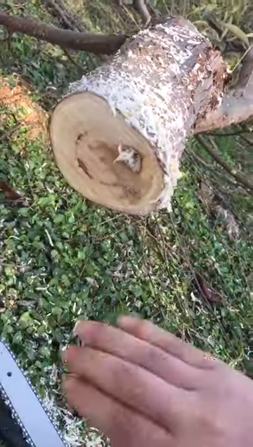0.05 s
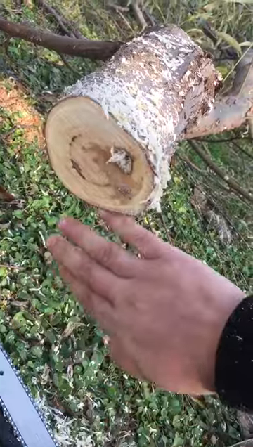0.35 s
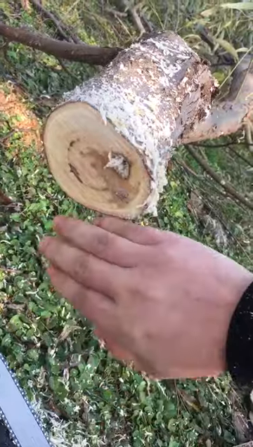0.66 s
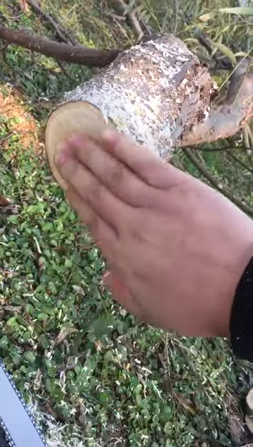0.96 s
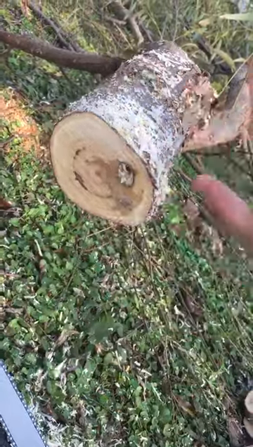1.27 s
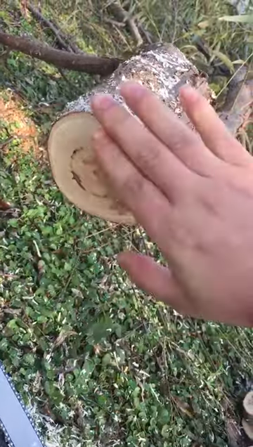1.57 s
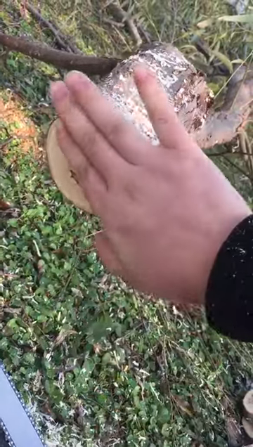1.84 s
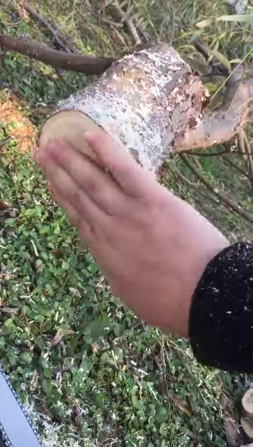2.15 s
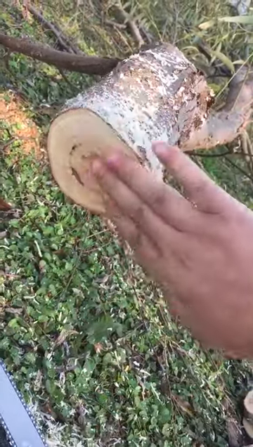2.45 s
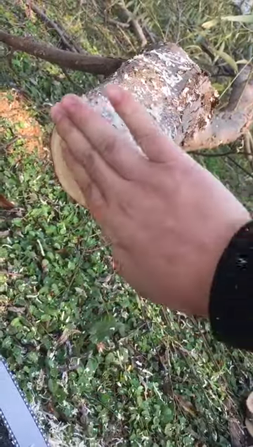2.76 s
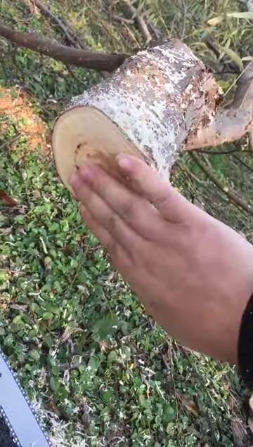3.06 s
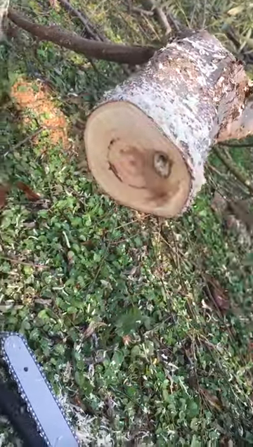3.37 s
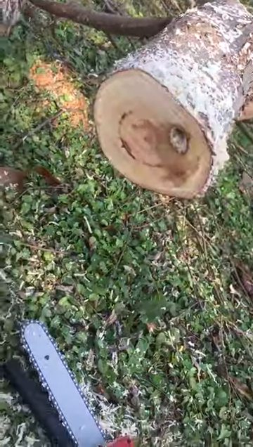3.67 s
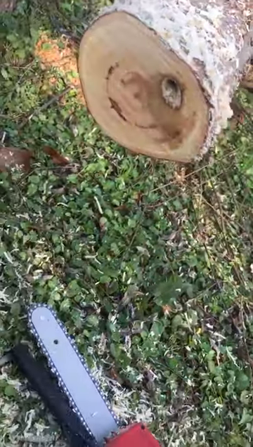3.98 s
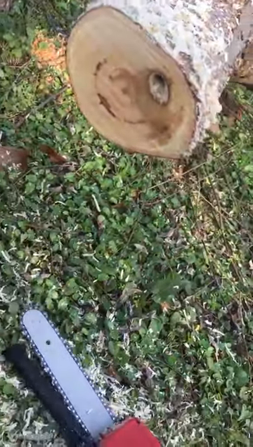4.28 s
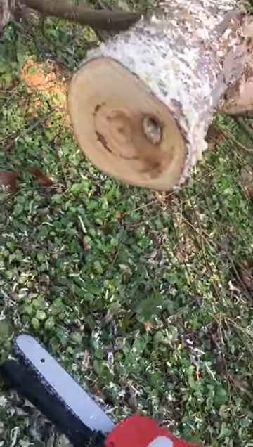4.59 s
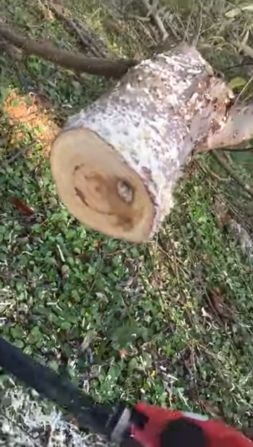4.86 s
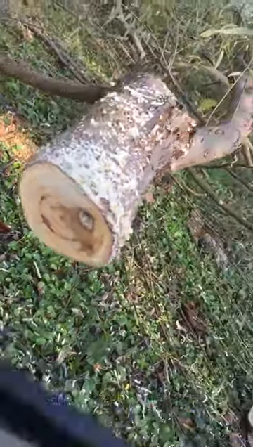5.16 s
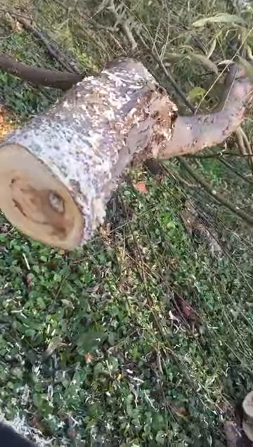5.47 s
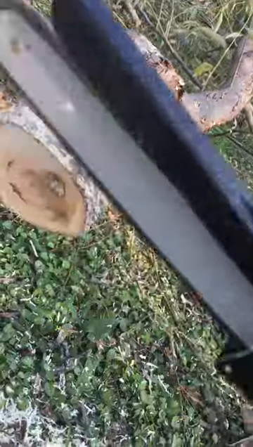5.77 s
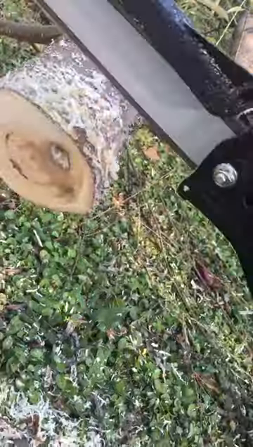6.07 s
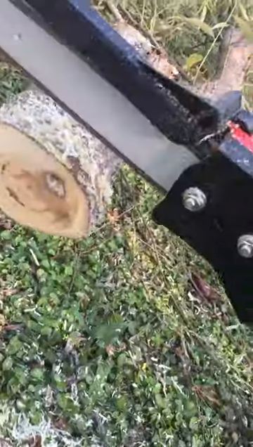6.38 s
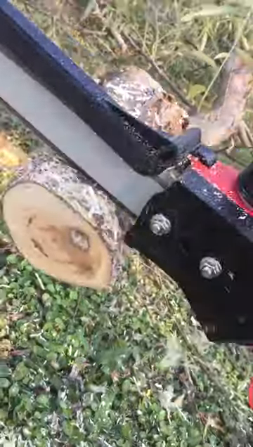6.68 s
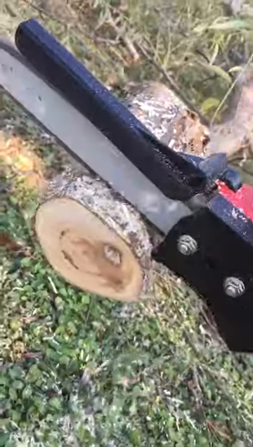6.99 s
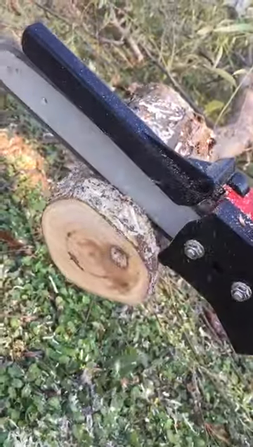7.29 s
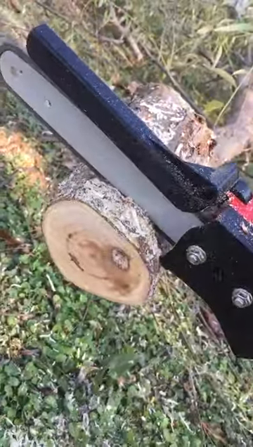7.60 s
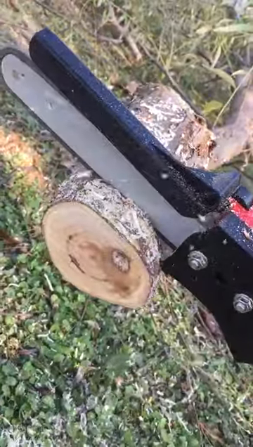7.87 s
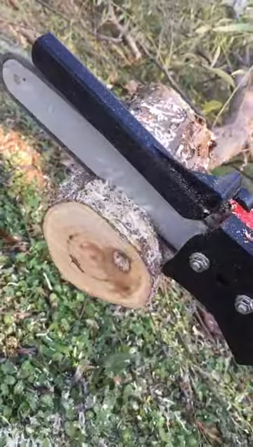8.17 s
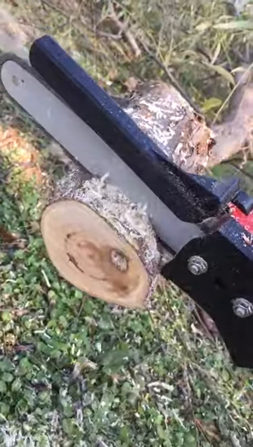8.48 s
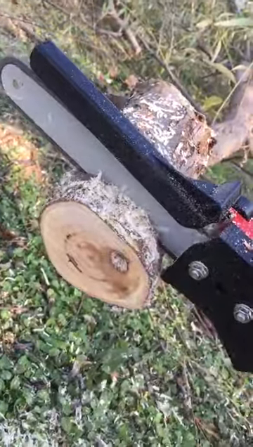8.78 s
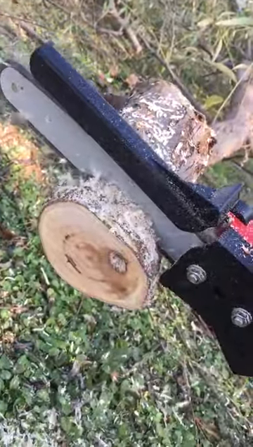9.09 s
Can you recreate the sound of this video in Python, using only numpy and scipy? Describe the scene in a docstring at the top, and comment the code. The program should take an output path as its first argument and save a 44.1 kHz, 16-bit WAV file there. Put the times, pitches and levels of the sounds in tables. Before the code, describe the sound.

A small cordless chainsaw is picked up and used close to the microphone outdoors. At first there is only soft distant air, a low rumble and tiny ticks of a hand on bark. The grip and trigger click sharply, then the saw starts with a slow rattle and quickly spins up. It cuts a log with a slightly wavering whine over a rasping chain, with occasional bright cracks of wood chips.

```python
"""A garden, one microphone close to a sawn log; outdoor air, low rumble and a faint drone far off.
A hand brushes the bark, then lifts a small cordless chainsaw: the casing scrapes, grip and trigger click.
The motor chirps, crawls with the slack chain jingling, spins up, and the chain bites into the wood.
Gear and motor tones glide through the fixed resonances of casing and bar, over the clatter of the chain,
and a few chips strike the guard."""
import sys
import numpy as np
from scipy import signal
from scipy.fft import rfft, irfft
from scipy.io import wavfile

SR = 44100
rng = np.random.default_rng(int(sys.argv[2]) if len(sys.argv) > 2 else 0)


def inscribe(sig):
    """Save sig as 16-bit PCM at rate SR to the path in sys.argv[1].

    A 1-D sig is mono; a 2-D sig holds one channel per row.
    Samples are clipped to [-1, 1] before scaling.
    """
    pcm = np.round(np.clip(np.atleast_2d(sig).T, -1, 1) * 32767)
    wavfile.write(sys.argv[1], SR, pcm.astype(np.int16))


N = 407484
TIME = np.arange(N) / SR
FREQS = np.fft.rfftfreq(N, 1 / SR)
START_S, RAMP_S, FULL_S = 5.5795, 5.986, 6.645  # the motor starts, begins to rev, is up to speed
WHINE_ORDER = 8  # cycles of motor whine per shaft turn


def amp(db):
    """Decibels to gain."""
    return 10 ** (np.asarray(db) / 20)


def unit(x):
    """Scales to rms 1."""
    return x / np.sqrt(np.mean(x ** 2) + 1e-20)


def curve(rows):
    """A table of (t/s, value), sample by sample."""
    return np.interp(TIME, *np.transpose(rows))


def since(s):
    """Seconds elapsed since s, zero before it."""
    return np.maximum(TIME - s, 0)


def spectrum_db(points, hz):
    """Reads a table of (f/Hz, level/dB) on a log-frequency axis."""
    f, db = np.transpose(points)
    return np.interp(np.log(hz + 1), np.log(f), db)


def lifts(peaks, hz):
    """Bell-shaped peaks and notches, in dB."""
    return sum(db * np.exp(-2 * ((hz - f) / width) ** 2) for f, width, db in peaks)


def bells(modes):
    """Gain of a few broad modes, nothing between them."""
    return sum(amp(db) * np.exp(-((FREQS - hz) / width) ** 2) for hz, width, db in modes)


def colour(x, gain):
    """Filters by a gain for each frequency."""
    return irfft(rfft(x) * gain, N)


def noise(gain):
    """Noise of rms 1, shaped by a gain for each frequency."""
    return unit(colour(rng.standard_normal(N), gain))


def wander(rate_hz):
    """Smooth random motion of rms 1."""
    return noise(np.exp(-(FREQS / rate_hz) ** 2))


def crackle(per_s, spread_db):
    """Sparse tiny slips of very uneven size, rms 1."""
    sizes = amp(spread_db * np.minimum(rng.exponential(1, N), 4)) * rng.choice([-1, 1], N)
    return unit(sizes * (rng.random(N) < per_s / SR))


def add(mix, s, sound):
    """Mixes a sound in at time s."""
    part = mix[round(s * SR):][:len(sound)]
    part += sound[:len(part)]


# Distant outdoor air and the rumble under it: f/Hz, level/dB
AIR_SPECTRUM = [(25, -34), (100, -10.5), (220, -2), (300, -6), (420, -13), (650, -15.5), (950, -13),
                (1400, -18), (2000, -25.5), (3000, -34), (5000, -43.5), (9000, -49.5), (14500, -52)]
RUMBLE_SPECTRUM = [(15, -60), (30, -27), (42, -9.5), (54, -0.5), (70, -3.5), (90, -8.5), (130, -11.5),
                   (200, -17.5), (300, -33.5), (1000, -90)]
def garden(air_db=-50.2, swell_db=.6, rumble_db=-40.2, drop_db=8, ease_s=6.45, ease_length_s=2.0):
    """A distant wash all round the microphone, over a low rumble; the low background drops in the second half."""
    air = amp(air_db + swell_db * wander(0.73)) * noise(amp(spectrum_db(AIR_SPECTRUM, FREQS)))
    eased = .5 * (1 + np.tanh((TIME - ease_s) / ease_length_s))
    rumble = amp(rumble_db - drop_db * eased) * noise(amp(spectrum_db(RUMBLE_SPECTRUM, FREQS)))
    return air + rumble


# Dry contact close up, shared by rubs, snaps and link ticks: f/Hz, level/dB
CONTACT_SPECTRUM = [(700, -24), (2000, 7.5), (4300, 4), (6500, 4.5), (9000, 2.5), (12000, 1.5), (14500, -5)]
# Strokes of hand and sleeve: middle t/s, half length/s, level/dB, tilt/(dB per octave)
HAND_STROKES = [(.2, .22, -74, -4), (.55, .04, -77, 0), (1.045, 0.016, -69, 2), (1.152, .05, -68, 0),
                (1.2, 0.01, -63, 3), (4.05, 0.81, -76.5, -2), (4.328, 0.04, -62, 1),
                (4.46, 0.085, -65.5, -2), (4.7, 0.13, -65, -1.5), (5.16, 0.06, -62.5, -2)]
def rubbing(gain_db=1, slips_per_s=1300, pivot_hz=7000):
    """Skin on bark and sleeve on casing, close by: each stroke is a faint crackle of tiny slips."""
    slips, out = crackle(slips_per_s, spread_db=3.6), np.zeros(N)
    for s, length, db, tilt in HAND_STROKES:
        tone = amp(spectrum_db(CONTACT_SPECTRUM, FREQS) + tilt * np.log2((FREQS + 1) / pivot_hz))
        out += amp(db) * np.exp(-((TIME - s) / length) ** 2) * unit(colour(slips, tone))
    return amp(gain_db) * out


def add_snap(mix, s, db, hz, width_hz, lift_db, crack_db=2, rattle_db=-8, rise_s=0.00032):
    """One dry snap: a sharp crack and a short rattle, coloured by the small part that gives way."""
    t = np.arange(0, .08, 1 / SR)
    decay = amp(-60 * t / 0.01) + amp(-15 - 60 * t / 0.044)  # quick fall, then a faint tail
    envelope = amp(rattle_db) * (1 - np.exp(-t / rise_s)) * decay
    force = envelope * rng.standard_normal(len(t))
    force[envelope.argmax()] += amp(crack_db)
    f = np.fft.rfftfreq(len(t), 1 / SR)
    tone = amp(db + spectrum_db(CONTACT_SPECTRUM, f) + lifts([(hz, width_hz, lift_db)], f))
    lead = len(t) // 16  # room for the filter to ring ahead of the crack
    add(mix, s - lead / SR, irfft(rfft(np.roll(force, lead)) * tone, len(t)))


# Dry ticks of bark and sleeve, close by: t/s, level/dB, f/Hz
BARK_TICKS = [(.3, -58, 4000), (.378, -59, 2000), (0.5424, -55, 7500), (1.047, -54, 5600),
              (1.1975, -48, 5600), (1.2054, -47, 5700), (1.4224, -54, 11800), (1.4661, -51, 11800),
              (2.2044, -57, 4600), (4.0364, -57, 6500), (4.498, -45, 11900), (4.591, -49, 4300),
              (4.6653, -42, 7000), (4.6904, -36, 3200), (5.529, -55, 11000)]
def bark_ticks(top_hz=12500, top_width_hz=2500, top_db=4):
    """Bark and sleeve tick: each small dry flake rings at its own pitch and is bright on top."""
    out = np.zeros(N)
    for s, db, hz in BARK_TICKS:
        add_snap(out, s, db, hz, width_hz=450, lift_db=12)
    return colour(out, amp(lifts([(top_hz, top_width_hz, top_db)], FREQS)))


def drone(db=-58.5, middle_s=2.75, half_length_s=0.62, hz=395, width_hz=45):
    """Far off, a faint narrow band of noise swells and fades."""
    swell = np.exp(-((TIME - middle_s) / half_length_s) ** 2)
    return amp(db) * swell * noise(bells([(hz, width_hz, 0)]))


# Modes of the plastic grip: f/Hz, level/dB, t60/s
GRIP_MODES = [(640, -21, 0.05), (950, -6.5, 0.024), (1500, -0.5, 0.016), (2230, -1, 0.019),
              (3100, 0, 0.011), (3920, -6, 0.013), (6500, -13, .008)]
# Knocks on the grip, close by: t/s, snap level/dB, ring level/dB, pitch factor,
# low-mode lift/dB, high-mode lift/dB, snap f/Hz, snap lift/dB
GRIP_KNOCKS = [(4.699, -28.5, -46, 1.07, 9, 7, 3300, 8), (5.065, -36, -39, 1.05, 7, 7, 7050, 8),
               (5.149, -45, -45, 1.2, 10, -8, 3800, 4), (5.206, -23, -31, 1.06, -2, -2, 6500, 6),
               (5.214, -38.5, -34, 1.01, -12, -8, 2150, 13), (5.232, -25, -40, 1, 0, -7, 11500, 7),
               (5.455, -36, -36, 1, 2, -12, 5750, 11)]
def knocks(low_below_hz=1200, high_above_hz=2600):
    """Hand and trigger knock on the grip: each knock snaps and rings the plastic."""
    t, out = np.arange(0, .08, 1 / SR), np.zeros(N)
    for s, snap_db, ring_db, pitch, low_db, high_db, snap_hz, lift_db in GRIP_KNOCKS:
        add_snap(out, s, snap_db, snap_hz, width_hz=800, lift_db=lift_db)
        for hz, db, t60 in GRIP_MODES:
            level = ring_db + db + low_db * (hz < low_below_hz) + high_db * (hz > high_above_hz)
            add(out, s, amp(level - 60 * t / t60) * np.sin(2 * np.pi * hz * pitch * t))
    return out


# The casing scraping along as the saw is lifted: t/s, level/dB
SCRAPE_LEVEL = [(4.87, -85), (4.91, -64), (5.0, -63.5), (5.1, -68), (5.2, -65), (5.26, -85)]
# Resonances of the scraped casing: f/Hz, width/Hz, level/dB
SCRAPE_BANDS = [(3300, 650, 0), (4300, 500, -5), (6000, 2400, -11)]
def scrape(slips_per_s=1200):
    """Quick slips ring the plastic casing as the saw is dragged up."""
    sliding = (TIME > SCRAPE_LEVEL[0][0]) & (TIME < SCRAPE_LEVEL[-1][0])
    slips = crackle(slips_per_s, spread_db=3)
    return sliding * amp(curve(SCRAPE_LEVEL)) * unit(colour(slips, bells(SCRAPE_BANDS)))


def chirp(hz=2700, db=-20, length_s=0.014):
    """The drive chirps in the motor windings at the start."""
    t, out = np.arange(0, length_s, 1 / SR), np.zeros(N)
    add(out, START_S, amp(db) * signal.windows.tukey(len(t), .15) * np.sin(2 * np.pi * hz * t))
    return out


# Pitch of the motor whine as the wood loads it: t/s, f/Hz
LOADED_WHINE = [(6.645, 2833), (6.71, 2723), (6.79, 2778), (6.83, 2715), (6.86, 2778), (6.88, 2738),
                (7.0, 2744), (7.04, 2682), (7.12, 2700), (7.16, 2663), (7.24, 2703), (7.37, 2652),
                (7.39, 2626), (7.54, 2607), (7.6, 2636), (7.65, 2592), (7.68, 2624), (7.73, 2623),
                (8.05, 2594), (8.08, 2638), (8.22, 2668), (8.27, 2595), (8.4, 2604), (8.47, 2653),
                (8.51, 2600), (8.65, 2595), (8.69, 2634), (8.78, 2607), (8.82, 2647), (8.89, 2619),
                (8.93, 2645), (9.14, 2580), (9.2, 2606), (9.23, 2570)]
def shaft(bite, crawl_hz=108, ramp_hz2_per_s=171000, sag=.003, flutter=.0028, stumble=.045):
    """Turns per second: a stumbling crawl, then a ramp until the load holds it, sagging as teeth bite."""
    ramp = np.sqrt(crawl_hz ** 2 + ramp_hz2_per_s * since(RAMP_S))  # constant power
    speed = np.minimum(ramp, curve(LOADED_WHINE) / WHINE_ORDER)
    unsteady = np.where(TIME < RAMP_S, stumble, flutter)
    return speed * (1 - sag * bite + unsteady * wander(44.6))


def push(release_s, attack_s=0.0047):
    """Extra drive, 0 to 1: on through the ramp, fading once the motor is up to speed."""
    return (1 - np.exp(-since(RAMP_S) / attack_s)) * np.exp(-since(FULL_S) / release_s)


def octaves(speed):
    """Shaft speed in octaves above its usual speed in the cut."""
    return np.log2(speed * WHINE_ORDER / np.median(np.array(LOADED_WHINE)[:, 1]))


def chain_levels(speed, jerk_db=3.5, jerk_delay_s=0.1, jerk_length_s=0.085):
    """Base clatter and hiss in dB: both grow with speed and push; the starting jerk adds brief hiss."""
    octave, drive = octaves(speed), push(release_s=0.26)
    jerk = jerk_db * np.exp(-((TIME - START_S - jerk_delay_s) / jerk_length_s) ** 2)
    clatter = -30 + 2.5 * octave + 3.5 * drive
    hiss = -22.5 + 6 * octave + 2 * drive + jerk
    return clatter, hiss


# Broad colour of the saw at close range: f/Hz, level/dB
SAW_SPECTRUM = [(60, -36), (130, -27), (215, -12), (300, -15), (480, -15), (720, -13.5), (900, -4),
                (1150, -4), (2400, -3), (2900, -5.5), (4200, -5), (7500, -10.5), (10500, -12), (14000, -14)]
# Resonances and dips of casing and bar: f/Hz, width/Hz, lift/dB
CASING_MODES = [(974, 150, 1.5), (1140, 130, 0), (1360, 257, 5.5), (2056, 240, 3.5), (2960, 82, -2.5),
                (3160, 240, 3.5), (3380, 410, 6.5), (3840, 220, 2.5), (4650, 160, 1.5), (5350, 90, -1),
                (5680, 780, 6), (6730, 1030, 3.5), (9030, 1370, 8.5), (11500, 900, 4.5), (12960, 540, 5)]
def casing(hz):
    """Gain with which the saw radiates each frequency."""
    return amp(spectrum_db(SAW_SPECTRUM, hz) + lifts(CASING_MODES, hz))


def small_modes(ripple_db=1.3, spacing_hz=45):
    """The crowd of small modes in bar and casing ripples the spectrum, less so in the bass."""
    hz = np.arange(0, SR / 2, spacing_hz)
    ripple = np.interp(FREQS, hz, rng.standard_normal(len(hz)))
    return amp(ripple_db * ripple * np.minimum(FREQS / 3000, 1))


def chain(speed, turns, link_order=0.47, body_db=7, edge_db=-0.67, thrum_hz=950, split_hz=3700):
    """Links slap the sprocket and teeth chip the wood: dense uneven impacts ring the casing."""
    clatter, hiss = chain_levels(speed)
    slowness = 1 - speed / speed.max()
    links = 1 + 0.032 * np.cos(2 * np.pi * link_order * turns)
    loose = amp(2.5 * slowness * wander(200))
    impacts = rng.standard_normal(N) * links * loose * amp(0.4 * wander(600))
    ringing = casing(FREQS) * small_modes()
    low = 1 / (1 + (FREQS / split_hz) ** 8)
    body = unit(colour(impacts, ringing * low))
    thrum = colour(body, np.exp(-(FREQS / thrum_hz) ** 10))
    body -= .5 * slowness * thrum  # a slow chain hardly shakes the low modes
    edge = unit(colour(impacts, ringing * (1 - low)))
    rasp = amp(0.73 * wander(110))  # cutters scrape unevenly
    return amp(clatter + body_db) * body + amp(hiss + edge_db) * rasp * edge


# Upper resonances of the bar: f/Hz, width/Hz, level/dB
BAR_MODES = [(5730, 650, 0.5), (6700, 500, -4.5), (8660, 500, -2.5), (9430, 660, -1), (12100, 600, -4),
             (13900, 450, -8.5)]
def bar_rasp(speed, gain_db=-14.5, flutter_db=3.5, flutter_hz=45):
    """Cutters scrape the bar in uneven bursts, each of its resonances fluttering on its own."""
    _, hiss = chain_levels(speed)
    scraping, out = rng.standard_normal(N), np.zeros(N)
    for hz, width, db in BAR_MODES:
        band = unit(colour(scraping, bells([(hz, width, 0)])))
        out += amp(db + flutter_db * wander(flutter_hz)) * band
    return amp(hiss + gain_db) * out


# Ring of the slack chain on the bar: f/Hz, width/Hz, level/dB
JINGLE_MODES = [(680, 140, -8.5), (1074, 116, 3), (1500, 160, 1), (2570, 280, -4.5), (2970, 220, -3),
                (6840, 260, -7), (9300, 120, -12), (10420, 520, 2), (12200, 550, -12)]
def jingle(db=-30, taut_s=6.0, fade_s=0.089, grain_db=3, grain_hz=200):
    """Loose links tap the bar until speed pulls the chain taut."""
    taps = rng.standard_normal(N) * amp(grain_db * wander(grain_hz))
    slack = .5 * (1 - np.tanh((TIME - taut_s) / fade_s))
    return amp(db) * slack * unit(colour(taps, bells(JINGLE_MODES)))


def rattle(gain_db=-23, ticks_per_s=90, spread_db=3, t60=0.0027, settle_s=0.5):
    """Single slack links tick against the bar, ever more softly as the chain settles."""
    t = np.arange(0, .02, 1 / SR)
    hits = (rng.random(N) < ticks_per_s / SR) * amp(spread_db * np.clip(rng.standard_normal(N), -2, 2))
    ticks = signal.oaconvolve(hits, amp(-60 * t / t60))[:N] * rng.standard_normal(N)
    settling = np.exp(-since(START_S) / settle_s)
    return amp(gain_db) * settling * colour(ticks, amp(spectrum_db(CONTACT_SPECTRUM, FREQS)))


# Shaft, gear and sprocket tones before the casing colours them:
# multiple of shaft speed, level/dB, growth/(dB per doubling of speed)
GEAR_TONES = [(1.003, 5, 5.5), (1.998, 1.5, 3), (2.605, 2.5, 11), (2.986, -4, 2), (3.973, -9, -0.5),
              (5.2, -17, -1), (5.95, -6.5, 1), (7.4, -12, 7), (7.73, -18, 22), (10.36, -8, 8),
              (13.03, -6, 9), (15.75, -20, 11), (23.9, -11, 1)]
def gears(speed, turns, gain_db=3.5, rough_db=1.0, rough_hz=55, backlash_turns=0.015):
    """Most tones grow with speed; each swells as it glides through a resonance, rough with backlash."""
    clatter, _ = chain_levels(speed)
    out, octave = np.zeros(N), octaves(speed)
    for multiple, db, growth in GEAR_TONES:
        phase = multiple * (turns + backlash_turns * wander(rough_hz))
        level = db + growth * octave + rough_db * wander(rough_hz)
        out += amp(level) * casing(multiple * speed) * np.sin(2 * np.pi * phase)
    return out * amp(clatter + gain_db)


# Housing modes, each shaken by one tone:
# multiple of shaft speed, f/Hz, half width/Hz, peak level/dB, backlash/turns
HOWL_MODES = [(2, 257, 57, -40.5, 0.026), (2, 363, 78, -32, 0.011), (3, 604, 76, -36.5, .012),
              (5.2, 1000, 160, -25, 0.022), (5.2, 1240, 190, -24.5, 0.034), (5.2, 1500, 114, -24.5, 0.032),
              (8, 1440, 84, -15.5, 0.017), (8, 1690, 130, -24, .015), (13, 3460, 180, -19, .03),
              (10.4, 3150, 170, -23.5, .032)]
def howl(speed, turns, backlash_hz=80):
    """Gear mesh and motor poles shake the housing as they sweep past its modes; backlash smears them."""
    out = np.zeros(N)
    for multiple, hz, width, db, backlash in HOWL_MODES:
        phase = multiple * (turns + backlash * wander(backlash_hz))
        resonance = np.exp(-((multiple * speed - hz) / width) ** 2)
        out += amp(db) * resonance * np.sin(2 * np.pi * phase)
    return out


# The slack chain slapping the bar as it gathers speed: t/s, level/dB
CHAIN_SLAPS = [(5.58, -25), (5.5889, -14.5), (5.6245, -20), (5.6354, -17), (5.6655, -21), (5.6954, -21),
               (5.7934, -17), (5.8944, -27), (6.0214, -24), (6.1394, -18), (6.1934, -16), (6.2734, -16)]
def slaps(t60=0.006):
    """Each slap of the chain is a short burst that rings casing and bar."""
    t, force = np.arange(0, .03, 1 / SR), np.zeros(N)
    for s, db in CHAIN_SLAPS:
        add(force, s, amp(db - 60 * t / t60))
    ringing = unit(casing(FREQS) * np.sqrt(FREQS))
    return colour(force * rng.standard_normal(N), ringing)


# Snatches at the start and at the rev: t/s, level/dB, release/s, tilt/(dB per octave)
CHAIN_SNATCHES = [(5.581, -26, 0.068, -2.5), (6.003, -24, 0.4, 2.5)]
# Rasp of the snatched links along the bar: f/Hz, width/Hz, level/dB
SNATCH_BANDS = [(650, 140, -11), (1250, 490, 5.5), (2520, 460, 5), (5830, 900, -9.5), (9100, 1200, -3),
                (11800, 1400, -12)]
def snatches(attack_s=0.0071, grain_db=2.5, grain_hz=250, pivot_hz=3000):
    """The drive snatches the loose chain and the links rasp; the rasp dies as the chain tightens."""
    out = np.zeros(N)
    for s, db, release_s, tilt in CHAIN_SNATCHES:
        envelope = (1 - np.exp(-since(s) / attack_s)) * np.exp(-since(s) / release_s)
        links = rng.standard_normal(N) * amp(grain_db * wander(grain_hz))
        tone = bells(SNATCH_BANDS) * amp(tilt * np.log2((FREQS + 1) / pivot_hz))
        out += amp(db) * envelope * unit(colour(links, tone))
    return out


# Narrow modes of the motor shell that the whine slides across: f/Hz, width/Hz, lift/dB
SHELL_MODES = [(2681, 71, 5.5), (3060, 50, 3)]
def whine(speed, turns, bite, db=-23, onset_hz=2540, onset_width_hz=45, push_db=4.5, choke_db=0.5):
    """The motor's pole tone sings near full speed, loudest under push; it chokes as teeth bite."""
    hz = WHINE_ORDER * speed
    swell = .5 * (1 + np.tanh((hz - onset_hz) / onset_width_hz))
    level = db + push_db * push(release_s=0.025) + lifts(SHELL_MODES, hz) - choke_db * bite
    rough_db, judder_rad = 0.5 * wander(90), .27 * wander(80)
    return swell * amp(level + rough_db) * np.sin(2 * np.pi * WHINE_ORDER * turns + judder_rad)


def saw(bites_per_s=11.3, scatter_cycles=0.304, take_up_s=0.019):
    """The saw running close to the microphone: one shaft drives chain, gears and whine."""
    # the cut grabs and frees the chain several times a second
    bite = np.sqrt(2) * np.sin(2 * np.pi * (bites_per_s * TIME + scatter_cycles * wander(4.99)))
    speed = shaft(bite)
    turns = np.cumsum(speed * (TIME > START_S)) / SR
    running = 1 - np.exp(-since(START_S) / take_up_s)  # the chain takes up its slack
    links = chain(speed, turns) + bar_rasp(speed) + jingle() + rattle()
    tones = gears(speed, turns) + howl(speed, turns) + whine(speed, turns, bite)
    return running * (links + tones)


# Wood chips torn from the cut: t/s, level/dB, f/Hz, t60/s
WOOD_CHIPS = [(7.0, -24, 6500, .03), (8.4959, -18.5, 6190, 0.038), (8.6589, -23, 9000, 0.021),
              (8.9936, -22, 6000, 0.019), (9.148, -14, 11800, .012)]
def chips(width_hz=2500):
    """Each chip is a short bright crack against the guard."""
    t = np.arange(0, .05, 1 / SR)
    f, out = np.fft.rfftfreq(len(t), 1 / SR), np.zeros(N)
    for s, db, hz, t60 in WOOD_CHIPS:
        band = np.exp(-((f - hz) / width_hz) ** 2)
        burst = irfft(rfft(rng.standard_normal(len(t))) * band, len(t))
        add(out, s, amp(db - 60 * t / t60) * unit(burst))
    return out


def scene():
    """Distant garden, near hand and saw, all at one microphone in the open air."""
    distant = drone() + garden()
    hand = rubbing() + scrape() + bark_ticks() + knocks()
    return (distant + hand + chirp() + saw() + slaps() + snatches() + chips())[None]


# Notches of the microphone port: f/Hz, width/Hz, lift/dB
PORT_NOTCHES = [(4980, 190, -2), (7500, 490, -1.5), (10300, 290, -3)]
def record(dry, edge_hz=14140):
    """The microphone port's notches, then the recorder's band limit."""
    heard = colour(dry, amp(lifts(PORT_NOTCHES, FREQS)))
    lowpass = signal.firwin(511, edge_hz, window=("kaiser", 9), fs=SR)
    return signal.oaconvolve(heard, lowpass[None], "same")


dry = scene()
out = record(dry)
inscribe(out)
```